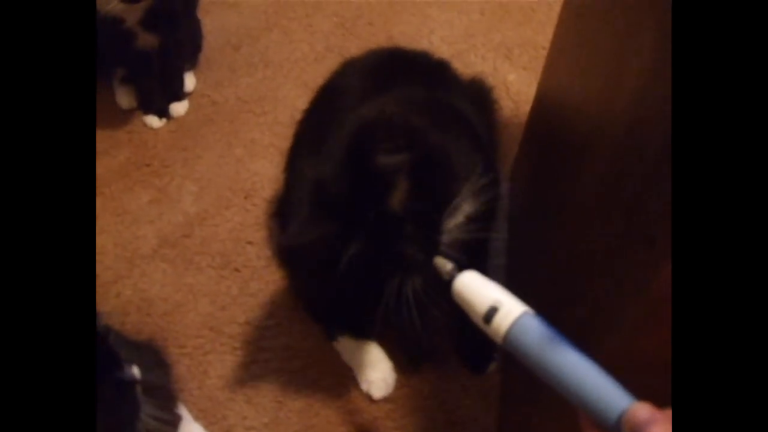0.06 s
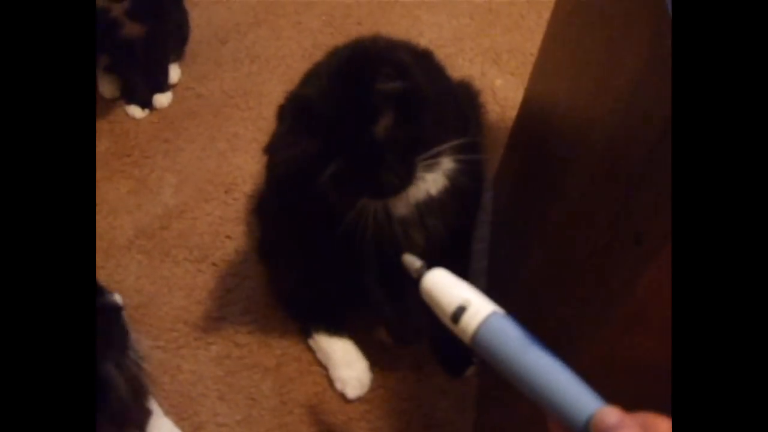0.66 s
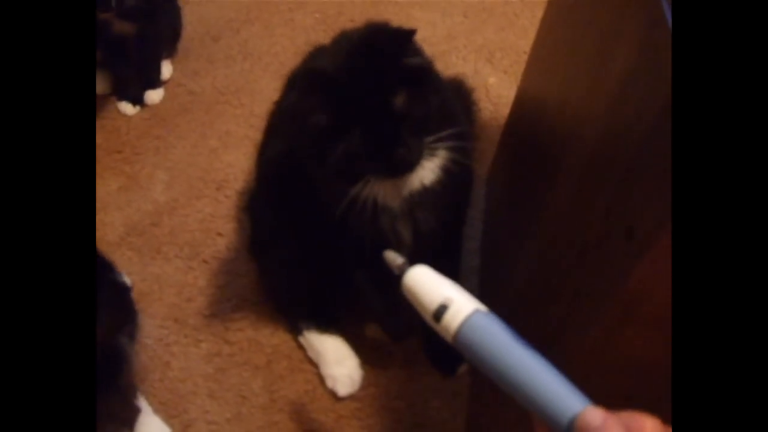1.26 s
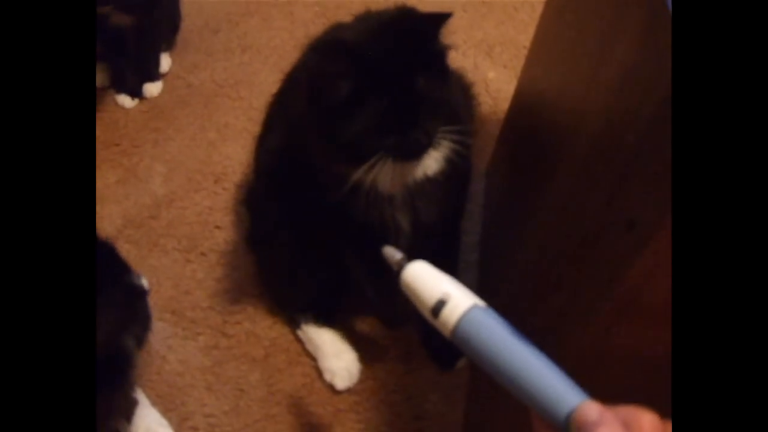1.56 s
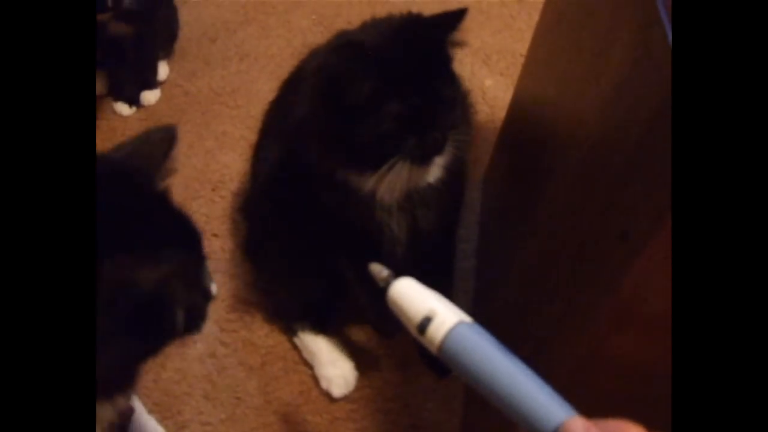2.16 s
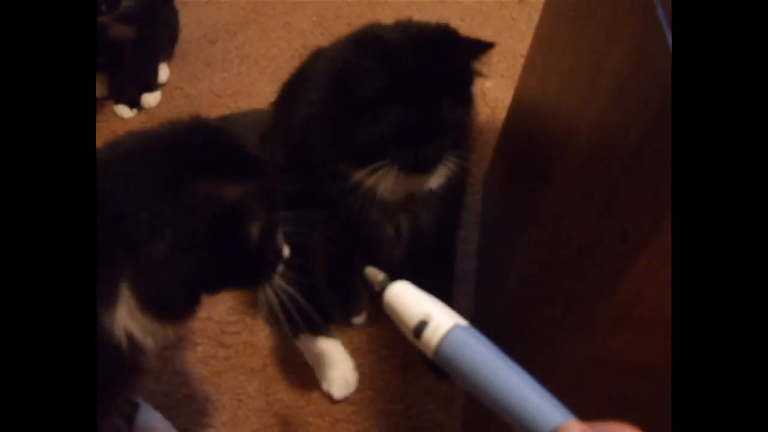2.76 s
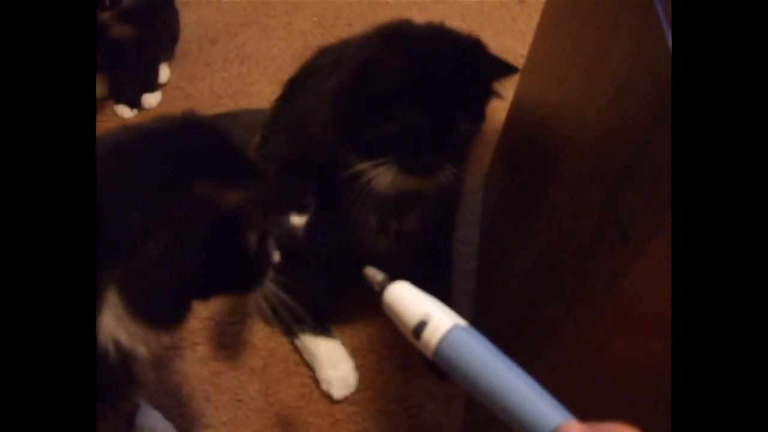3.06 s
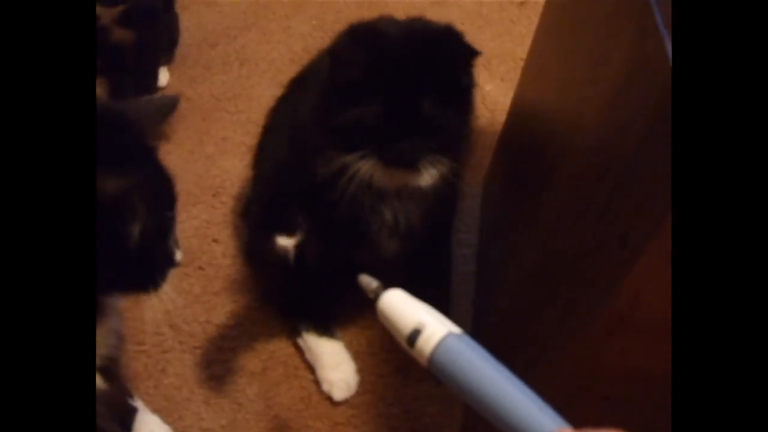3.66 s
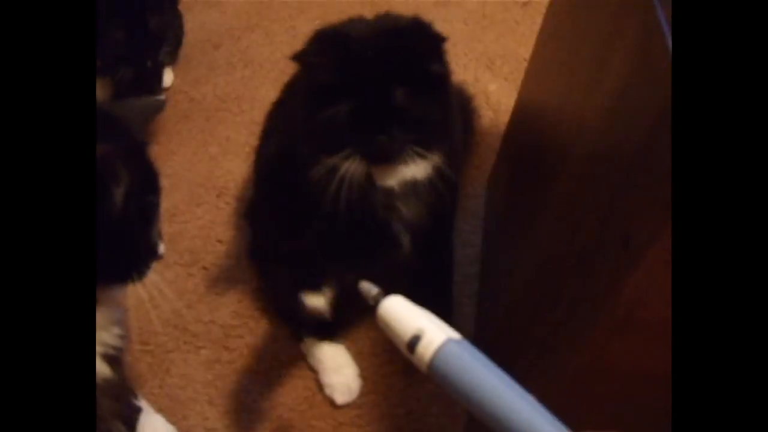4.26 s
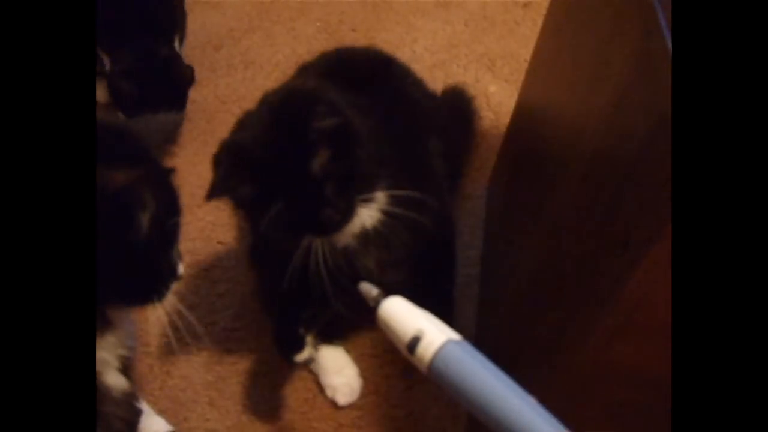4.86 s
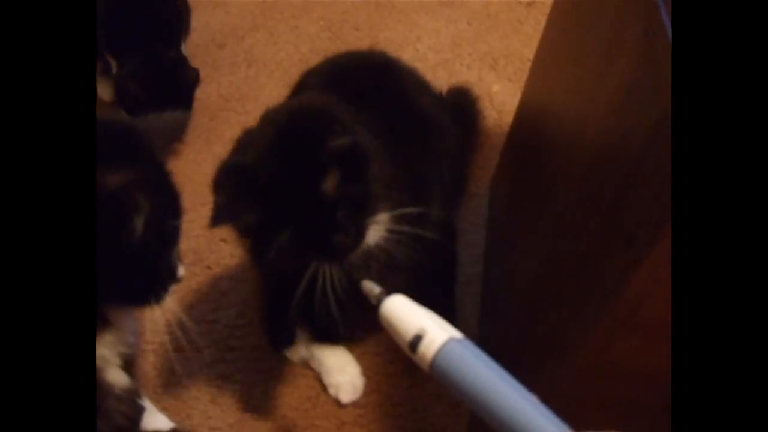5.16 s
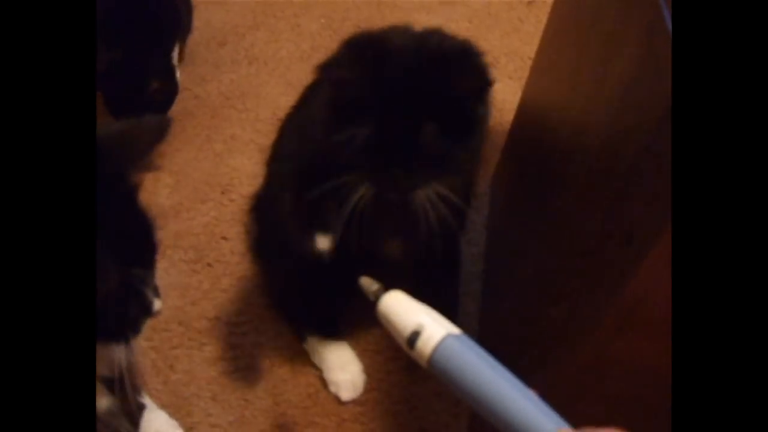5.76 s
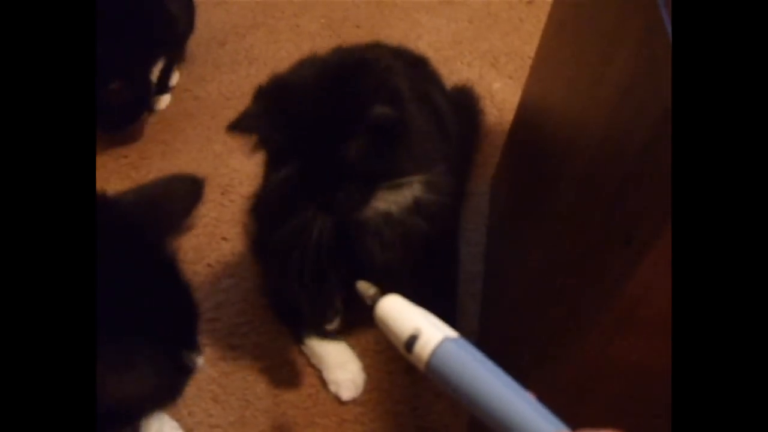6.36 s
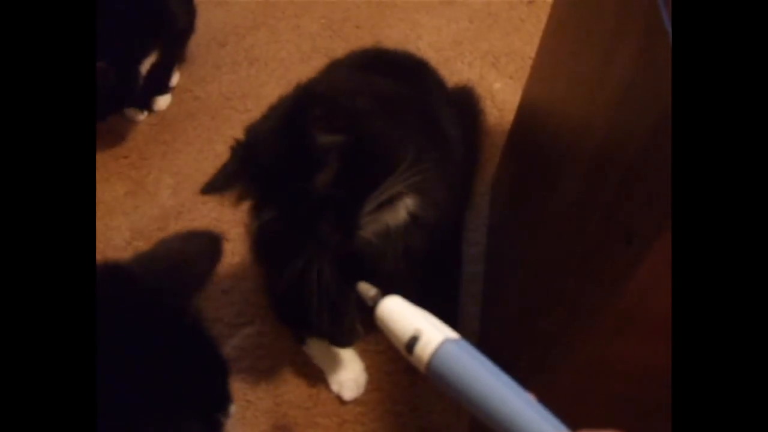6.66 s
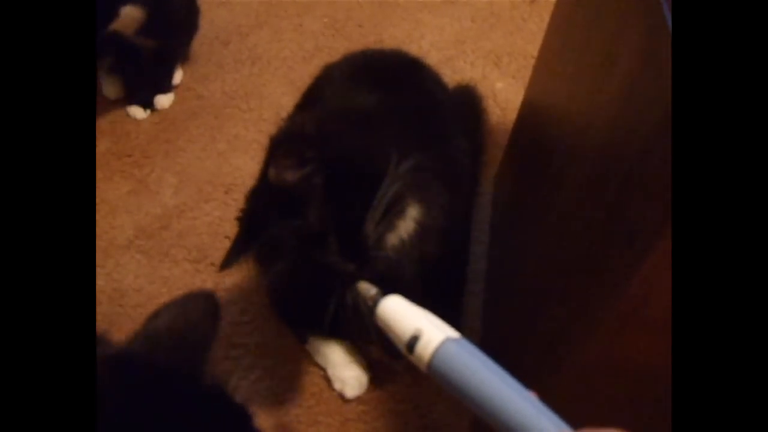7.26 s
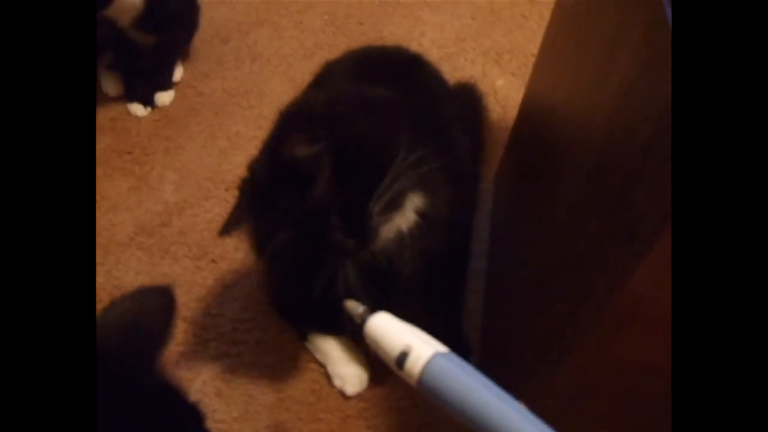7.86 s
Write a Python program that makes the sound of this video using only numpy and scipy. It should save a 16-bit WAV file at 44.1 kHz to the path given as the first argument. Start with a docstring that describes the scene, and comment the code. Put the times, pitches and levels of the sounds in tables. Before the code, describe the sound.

A small battery nail grinder runs close to the microphone in a quiet room for the whole eight seconds. Its sound is a steady, high whine over a weaker low buzz and a fine hiss, wavering slightly in pitch and level and creeping a little higher over the first second and a half. During the first second there are a few soft, dull bumps, and a faint, brief rasp with some rustle swells at about 0.7 seconds. At about 4 seconds the tip is knocked with one sharp, gritty click, the loudest moment. The motor immediately sags in pitch and gives a bright, buzzing rattle for roughly half a second. By about 5 seconds it has regained speed and the clean whine is back. It carries on evenly to the end, with very faint bumps near 5.5 and 7.2 seconds.

```python
"""Nail grinder in a quiet room

Carpeted room, one microphone, close to a small battery nail grinder held out towards a silent cat.
The motor ticks once a turn, about 190 times a second; the plastic shell turns that into a high whine.
Midway the tip is knocked: the motor sags, the shaft rattles and the speed recovers.
A brief rasp and a few soft bumps sound nearby."""
import sys
import numpy as np
from scipy import signal
from scipy.fft import rfft, irfft, next_fast_len
from scipy.io import wavfile

SR = 44100
rng = np.random.default_rng(int(sys.argv[2]) if len(sys.argv) > 2 else 0)


def log_audio(samples):
    """Write samples as a 16-bit WAV file to the path given in sys.argv[1]."""
    # one column per channel
    frames = np.atleast_2d(samples).T
    # limit to full scale, then quantise
    limited = np.clip(frames, -1, 1)
    pcm = np.round(limited * 32767).astype(np.int16)
    wavfile.write(sys.argv[1], SR, pcm)


N = 352799
TIME = np.arange(N) / SR
JAR_S, SAG_RISE_S = 4.024, .04  # the knock jars the shaft loose; its drag sets in


def from_db(db):
    """Decibels to gain."""
    return np.exp(np.asarray(db) * (np.log(10) / 20))


def unit_rms(x):
    """Scale to unit power."""
    return x / np.sqrt(np.mean(x ** 2) + 1e-20)


def curve(rows):
    """Rows of (t/s, value), interpolated at every sample."""
    return np.interp(TIME, *np.transpose(rows))


def drift(rate_hz):
    """Smooth random wander with a spread of about 1."""
    knots = rng.standard_normal(int(rate_hz * N / SR) + 4)
    fine = signal.resample(knots, 8 * len(knots))
    return np.interp(TIME * rate_hz * 8, np.arange(len(fine)), fine)


def noise(colour):
    """Unit-power noise shaped by rows of (f/Hz, relative level/dB)."""
    hz, db = np.transpose(colour)
    size = next_fast_len(N)
    log_hz = np.log(np.maximum(np.fft.rfftfreq(size, 1 / SR), 1))
    gain = from_db(np.interp(log_hz, np.log(hz), db))
    return unit_rms(irfft(rfft(rng.standard_normal(size)) * gain)[:N])


def resonate(x, hz, width_hz):
    """One resonance with gain 1 at its peak."""
    r = np.exp(-np.pi * width_hz / SR)
    feedback = [1, -2 * r * np.cos(2 * np.pi * hz / SR), r * r]
    return signal.lfilter(np.array([1, 0, -1]) * (1 - r * r) / 2, feedback, x + 1e-18)


def narrow_noise(hz, width_hz):
    """Unit-power noise through two resonances at one pitch."""
    band = resonate(rng.standard_normal(N), hz, width_hz)
    return unit_rms(resonate(band, hz, 2 * width_hz))


def burst(start_s, rise_s, decay_s):
    """Envelope that rises quickly and dies away."""
    age = np.maximum(TIME - start_s, 0)
    return (1 - np.exp(-age / rise_s)) * np.exp(-np.minimum(age / decay_s, 20))


def after_jar(rise_s, hold_s, release_s):
    """Envelope, 0 to 1, that the knock sets off."""
    age = np.maximum(TIME - JAR_S, 0)
    return (1 - np.exp(-age / rise_s)) * np.exp(-np.maximum(age - hold_s, 0) / release_s)


# Colour of the room and microphone floor: f/Hz, relative level/dB
FLOOR_COLOUR = [(10, 1), (29, 9.5), (42, 2), (60, 3), (130, 1), (450, 1), (900, -1), (1500, -3.5),
                (3500, -3.5), (7500, -6.5)]


def room_tone(level_db=-51.5):
    """The steady floor of the room and the microphone's own noise."""
    return from_db(level_db) * noise(FLOOR_COLOUR)


# Soft bumps nearby: t/s, nominal level/dB, f/Hz, decay/s
BUMPS = [(0.099, -52, 250, 0.014), (.43, -48.5, 230, 0.013), (.51, -49, 1590, 0.0082),
         (.96, -57.5, 300, 0.013), (5.54, -54.5, 400, 0.015), (7.235, -49, 290, 0.012)]


def bumps(width_hz=130, rise_s=.0032):
    """Dull, well damped touches near the microphone."""
    return sum(2 * from_db(db) * burst(start_s, rise_s, decay_s) * narrow_noise(hz, width_hz)
               for start_s, db, hz, decay_s in BUMPS)


# Colour of the rustle under the rasp: f/Hz, relative level/dB
RUSTLE_COLOUR = [(60, -9), (220, 0.5), (600, -1), (1300, -5.5), (2000, -7), (3500, -11), (7000, -16.5)]


def rasp(peak_s=.72, rasp_db=-50.5, rustle_db=-55):
    """Nearby, a narrow rasp and a broad rustle flutter, swell and fade together."""
    band = narrow_noise(hz=1880, width_hz=180)
    flutter = drift(60)
    narrow = band * from_db(rasp_db + flutter)
    rustle = noise(RUSTLE_COLOUR) * from_db(rustle_db + 1.5 * flutter)
    return sum(layer * np.exp(-((TIME - peak_s) / spread_s) ** 2 / 2)
               for layer, spread_s in ((narrow, .11), (rustle, .22)))


# Colour of the brush hiss, close up: f/Hz, relative level/dB
BRUSH_COLOUR = [(2500, -29), (4000, -17), (4750, -5), (5100, -10), (6400, -0.5), (7200, -6.5)]


def brushes(turns, level_db=-55.5, sputter_db=3.5):
    """The motor's brushes give a sputtering hiss that pulses once a turn."""
    pulse = 1 + .5 * np.cos(2 * np.pi * turns)
    return from_db(level_db + sputter_db * drift(25)) * noise(BRUSH_COLOUR) * pulse


def partial(turns, k, scatter_rad, wander_rad, tremor_db=.54, roughness=.06):
    """Harmonic k of the turn; the hand's tremor and the brushes make it waver."""
    waver = from_db(tremor_db * drift(24)) * (1 + roughness * drift(160))
    # The path from shell to microphone changes as the tool moves, so the tick sharpens and smears.
    path_phase = scatter_rad * drift(.701) + wander_rad * drift(4)
    return np.sqrt(2) * waver * np.cos(2 * np.pi * k * turns + path_phase)


# Harmonics of the turn, away from resonance: multiple, base level/dB
HARMONICS = [(1, -70.5), (2, -66.5), (3, -74.5), (4, -69.5), (5, -67), (6, -69.0), (7, -72.5), (8, -66),
             (9, -63.5), (10, -65), (11, -63), (12, -64), (13, -67), (14, -67), (15, -60), (16, -65.5),
             (17, -75), (18, -60.5), (19, -63), (20, -75), (21, -61.5), (22, -70), (23, -62.5), (24, -62),
             (25, -61), (26, -56.9), (27, -49.5), (28, -50.5), (29, -54.5), (30, -58), (31, -46.5),
             (32, -59.5), (33, -53.5), (34, -52.5), (35, -61), (36, -59.5), (37, -57), (38, -67.5)]
# Speeds at which a harmonic meets a narrow housing resonance: multiple, speed/Hz, width/Hz, boost/dB
HOUSING_RESONANCES = [(4, 193.8, 6.6, 7), (6, 190.9, 3.8, 9), (10, 191.4, 8.9, 7.5), (11, 193.9, 7.7, 10.5),
                      (12, 194.0, 5.2, 10), (13, 191.3, 4.2, 8.5), (17, 194.8, 1.1, 14),
                      (22, 194.5, 4.6, 15), (24, 194.5, 3, 6.5), (25, 188.8, 3.7, 14.5),
                      (25, 194.5, 2.5, 8), (27, 194.7, 2.0, 3), (30, 192.8, 2.6, 6), (32, 193.9, 2.5, 8),
                      (33, 193.9, 4.2, 10), (35, 187.2, 8.0, 14), (38, 187.6, 5.6, 12.9)]
# Whistles that change for good once the tip is knocked: multiple, change/dB
KNOCKED_WHISTLES = [(25, -3.5), (27, -1.3), (30, 0.5), (31, -9)]


def harmonics(turns, speed, multiples, sway_db, scatter_rad, wander_rad):
    """Harmonics swell near their resonant speeds; the hand's sway trades power among them."""
    knocked = np.clip((TIME - JAR_S) / SAG_RISE_S, 0, 1)
    steady_power, swayed_power, tone = 0, 0, 0
    for k in multiples:
        boost_db = sum(db / (1 + (2 * (speed - hz) / width_hz) ** 2)
                       for multiple, hz, width_hz, db in HOUSING_RESONANCES if multiple == k)
        change_db = sum(db for multiple, db in KNOCKED_WHISTLES if multiple == k)
        gain = from_db(HARMONICS[k - 1][1] + boost_db + change_db * knocked)
        swayed_gain = gain * from_db(sway_db * drift(3.487))
        steady_power += gain ** 2
        swayed_power += swayed_gain ** 2
        tone += swayed_gain * partial(turns, k, scatter_rad, wander_rad)
    return tone * np.sqrt(steady_power / swayed_power)


def buzz(turns, speed, trim_db=.34, cruise_hz=193.18, db_per_hz=.56):
    """The low harmonics come from the motor body, louder the faster it turns."""
    tone = harmonics(turns, speed, range(1, 22), sway_db=1, scatter_rad=1.85, wander_rad=.28)
    return from_db(trim_db + db_per_hz * (speed - cruise_hz)) * tone


# Whine at the microphone, about 4.2-5.5 kHz, 5.5-6.2 kHz and above: t/s, relative level/dB
LOWER_WHINE = [(0.0, 0.6), (0.38, -0.3), (0.92, 1.9), (1.36, 2), (1.57, -1.2), (1.99, 1.5), (3.01, -1.2),
               (3.09, 0.3), (3.41, -1.5), (3.85, 1.1), (4.66, -1), (5.1, -7.5), (5.4, 0), (6.06, 1.3),
               (6.47, -2), (6.88, 4), (7.48, -1), (8.0, 1.5)]
MIDDLE_WHINE = [(0.0, -5), (0.56, -2.2), (0.82, 3.5), (1.18, -3), (1.55, 4.5), (1.97, 1), (2.5, 4),
                (2.79, 1), (3.26, 2.5), (3.69, 0.8), (4.72, -2), (5.51, -1.5), (5.83, -2), (6.57, 1),
                (6.88, 5.5), (7.18, 0), (7.9, 1.8), (8.0, -1)]
UPPER_WHINE = [(0.0, -4), (0.37, -0.8), (0.87, 2), (1.08, 2), (1.23, -1.2), (1.99, 0.5), (2.66, 2),
               (3.02, -1.2), (3.52, -2.5), (4.03, -1.5), (4.43, 2), (5.27, 1.1), (5.43, 2.7), (6.2, -0.8),
               (6.41, -2.2), (6.88, -1.0), (7.47, 0.2), (8.0, -1.3)]


def whine(turns, speed, trim_db=.29, flicker_db=.61, duck_db=-8):
    """The shell radiates the high harmonics in three bands, each with its own slow level."""
    bands = ((LOWER_WHINE, range(22, 29)), (MIDDLE_WHINE, range(29, 33)), (UPPER_WHINE, range(33, 39)))
    tone = 0
    for levels, multiples in bands:
        band = harmonics(turns, speed, multiples, sway_db=2.5, scatter_rad=1.465, wander_rad=.2)
        tone += from_db(curve(levels)) * band
    # The clean whine gives way to the rattle and is back a little before that ends.
    ducked = after_jar(rise_s=.008, hold_s=.2, release_s=.086)
    return tone * from_db(trim_db + flicker_db * drift(32) + duck_db * ducked)


# Contacts on the tip: t/s, nominal level/dB
TIP_CONTACTS = [(4.0185, -32), (4.0205, -28.5), (4.0233, -27.5), (4.0255, -27.5), (4.0275, -32),
                (4.031, -33)]
# Colour of the knock, close up: f/Hz, relative level/dB
KNOCK_COLOUR = [(200, -31), (750, -4), (1400, -13), (2150, 7), (2900, -6.5), (4200, 2), (5500, 3),
                (7200, 1), (9000, -12)]


def knock(rise_s=.00023, decay_s=.0012):
    """The spinning tip skips over whatever touches it in a quick run of gritty contacts."""
    contacts = sum(from_db(db) * burst(start_s, rise_s, decay_s) for start_s, db in TIP_CONTACTS)
    return noise(KNOCK_COLOUR) * contacts


# Resonances of the plastic shell that the rattle excites: f/Hz, width/Hz, relative level/dB
SHELL_MODES = [(2260, 300, -14), (4650, 120, -3), (5300, 160, -10), (5860, 220, -1.5), (6380, 200, -2.5),
               (6600, 130, -0.5), (6940, 150, -1)]


def rattle(turns, level_db=-41.5, uneven_db=.8, grit=.076, scrape_turns=.26, wobble_hz=26.8):
    """The loose shaft slaps its bearing once a turn and scrapes briefly; its wobble settles first."""
    loose = after_jar(rise_s=.008, hold_s=.24, release_s=.17)
    wobble = .39 * after_jar(rise_s=.008, hold_s=.135, release_s=.035)
    slaps = np.diff(np.floor(turns), prepend=0)
    scrape = grit * rng.standard_normal(N) * (wobble + np.exp(-(turns % 1) / scrape_turns))
    force = (slaps + scrape) * from_db(uneven_db * drift(120))
    ringing = sum((-1) ** i * from_db(db) * resonate(force, hz, width_hz)
                  for i, (hz, width_hz, db) in enumerate(SHELL_MODES))
    crest_s = TIP_CONTACTS[0][0] + .027
    throb = (1 + wobble * np.cos(2 * np.pi * wobble_hz * (TIME - crest_s))) / (1 + wobble)
    return from_db(level_db) * loose * throb * unit_rms(ringing)


# Turning rate of the free-running motor: t/s, f/Hz
FREE_SPEED = [(0.0, 186.75), (0.18, 186.9), (0.64, 189.99), (1.02, 190.7), (1.54, 193.5), (2.0, 191.91),
              (2.47, 193.44), (2.8, 192.39), (3.14, 194.25), (3.64, 193.75), (3.98, 194.95), (4.96, 190.41),
              (5.65, 190.49), (5.94, 192.41), (6.36, 192.31), (6.88, 195.01), (7.51, 193.83), (8.0, 194.23)]


def grinder(sag_hz=23, flutter=.0007):
    """The tool, close to the microphone: one shaft drives every layer and drags when jarred loose."""
    drag = after_jar(SAG_RISE_S, hold_s=.189, release_s=.241)
    speed = curve(FREE_SPEED) - sag_hz * drag
    turns = np.cumsum(speed * (1 + flutter * drift(60))) / SR
    return brushes(turns) + buzz(turns, speed) + whine(turns, speed) + rattle(turns)


def scene():
    """Mono: grinder and knock up close, bumps and rasp nearby, room tone behind."""
    return (grinder() + knock() + bumps() + rasp() + room_tone())[None]


def record(dry, stopband_hz=7780, dc_offset=-.0024):
    """A narrow-band recorder cuts the top steeply; its converter rests slightly off zero."""
    lowpass = signal.cheby2(24, 70, stopband_hz, fs=SR, output="sos")
    return signal.sosfilt(lowpass, dry) + dc_offset


dry = scene()
out = record(dry)
log_audio(out)
```